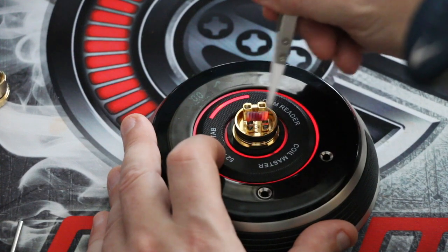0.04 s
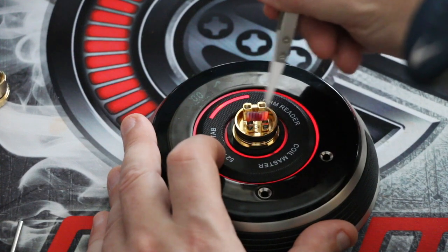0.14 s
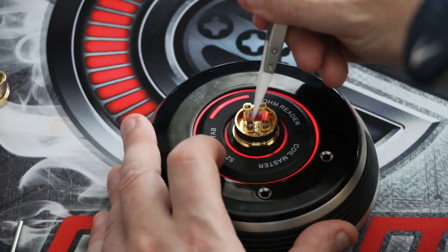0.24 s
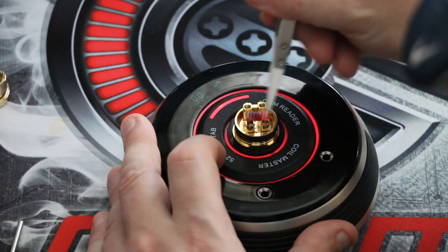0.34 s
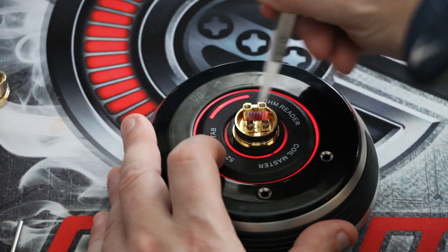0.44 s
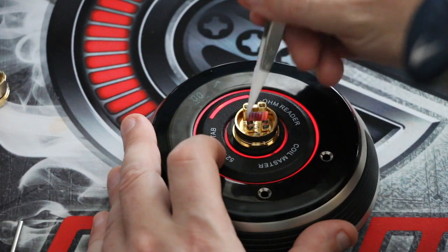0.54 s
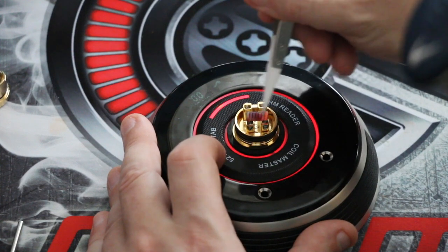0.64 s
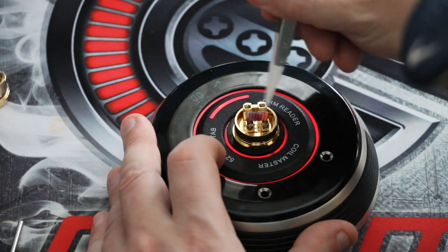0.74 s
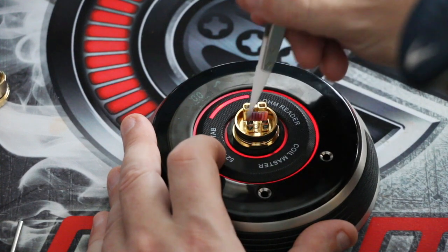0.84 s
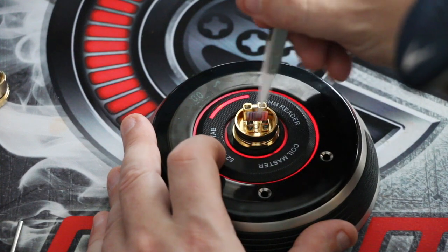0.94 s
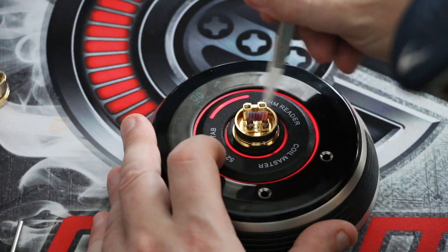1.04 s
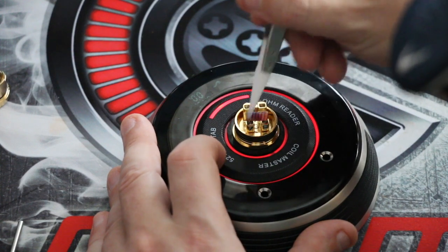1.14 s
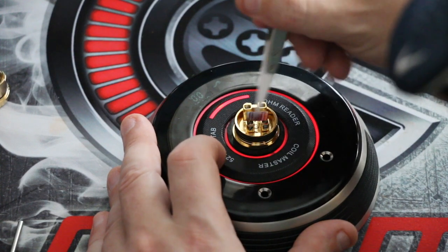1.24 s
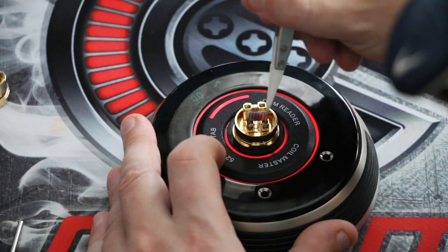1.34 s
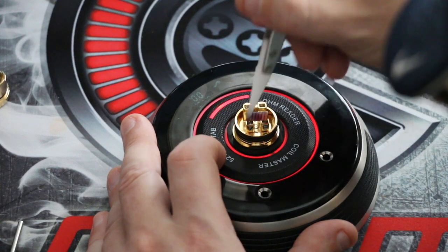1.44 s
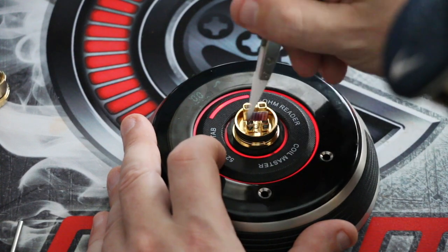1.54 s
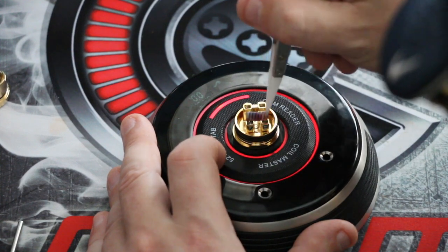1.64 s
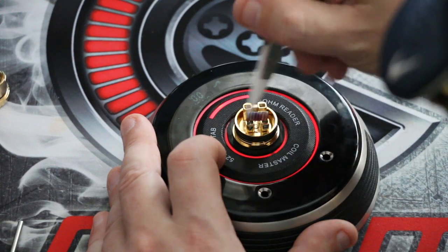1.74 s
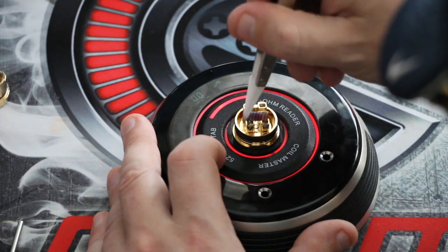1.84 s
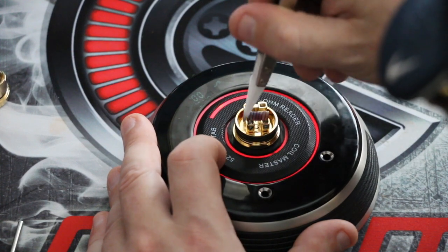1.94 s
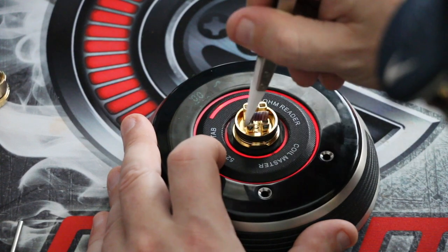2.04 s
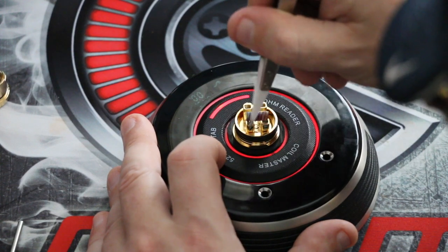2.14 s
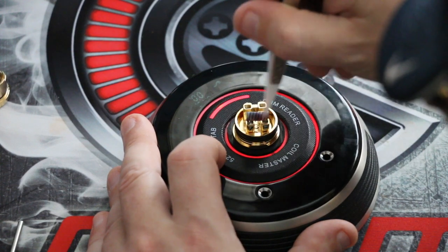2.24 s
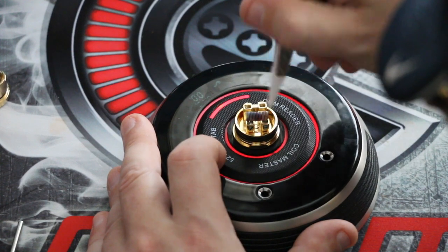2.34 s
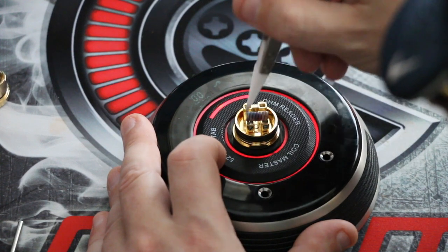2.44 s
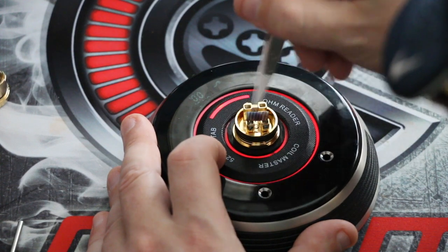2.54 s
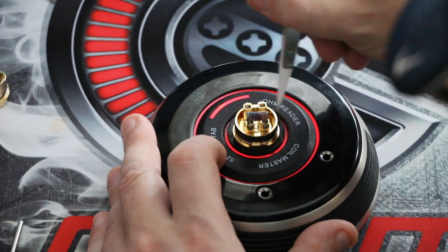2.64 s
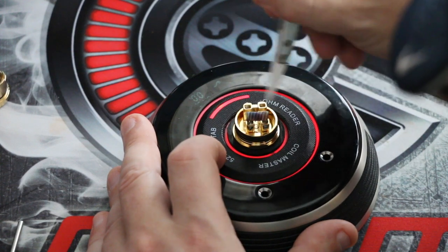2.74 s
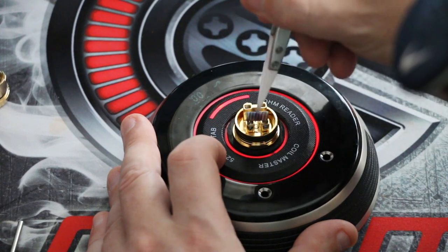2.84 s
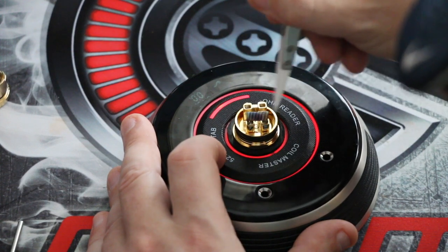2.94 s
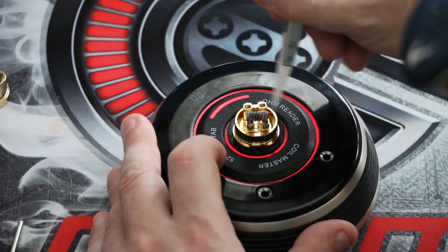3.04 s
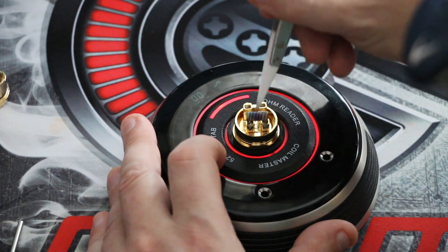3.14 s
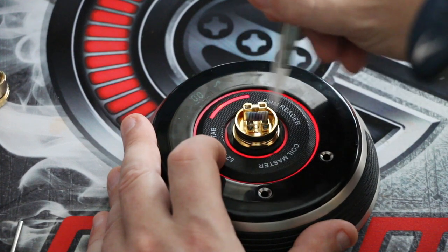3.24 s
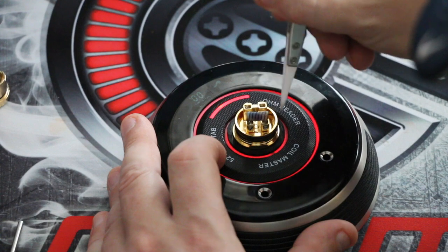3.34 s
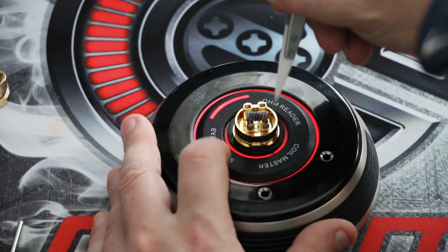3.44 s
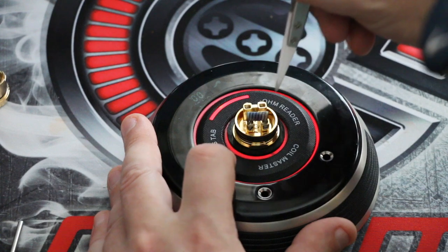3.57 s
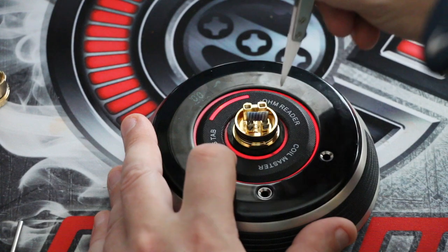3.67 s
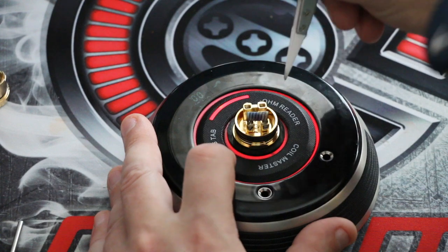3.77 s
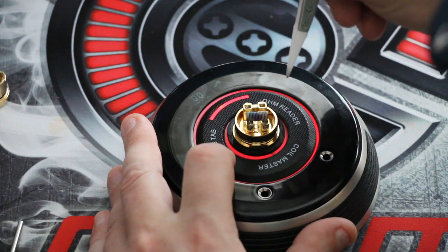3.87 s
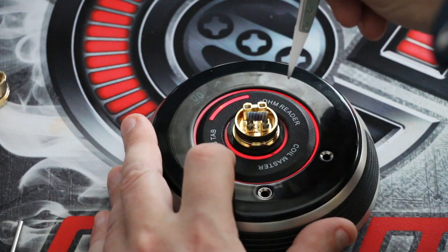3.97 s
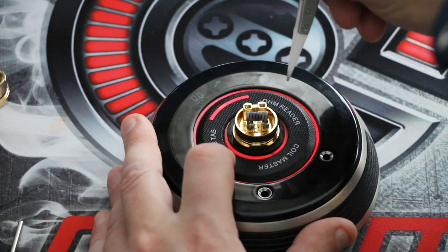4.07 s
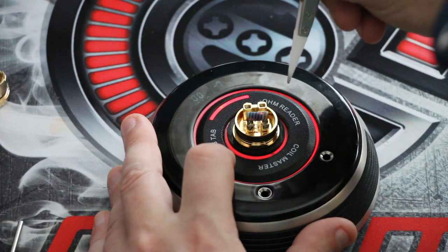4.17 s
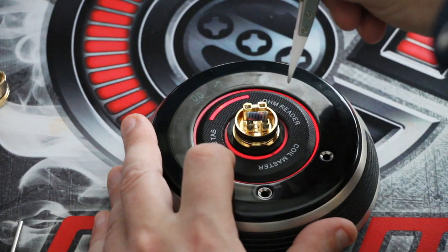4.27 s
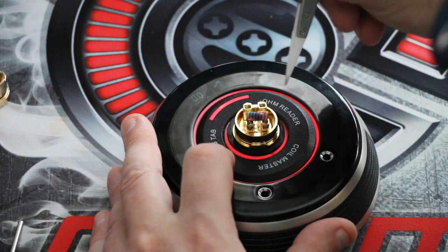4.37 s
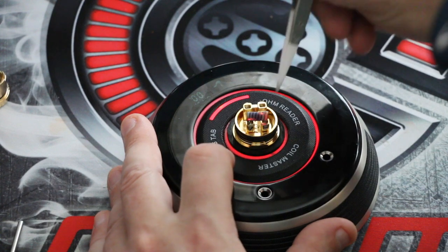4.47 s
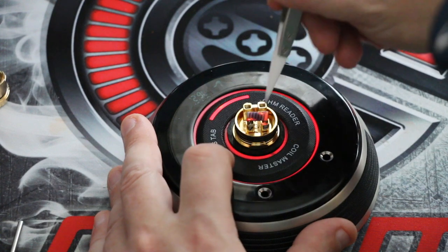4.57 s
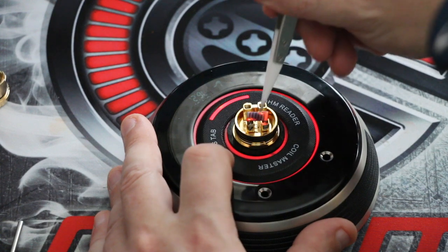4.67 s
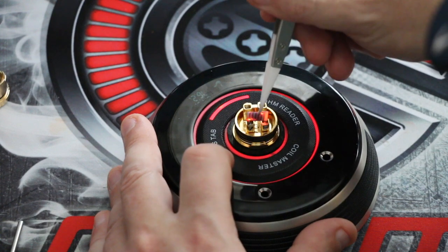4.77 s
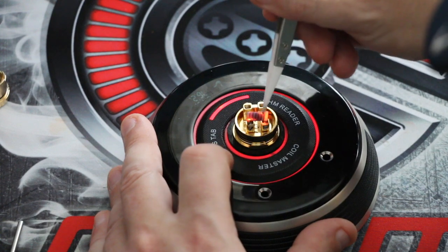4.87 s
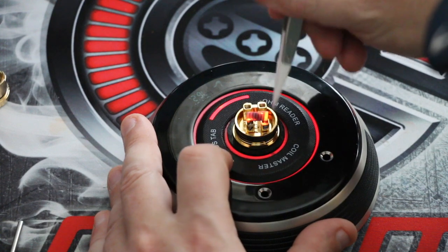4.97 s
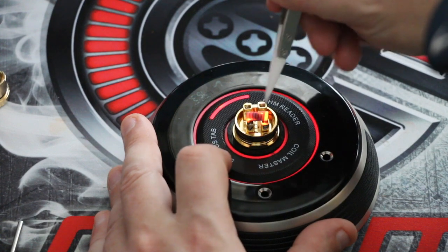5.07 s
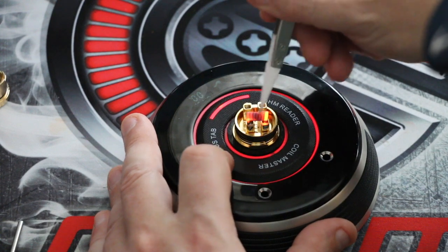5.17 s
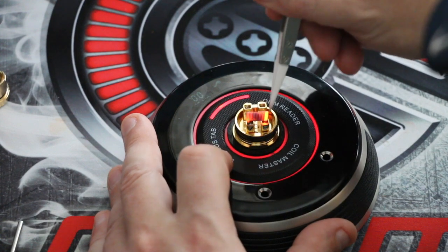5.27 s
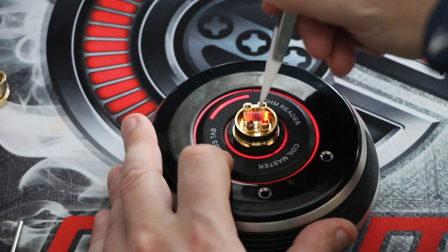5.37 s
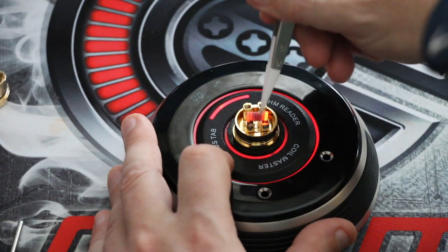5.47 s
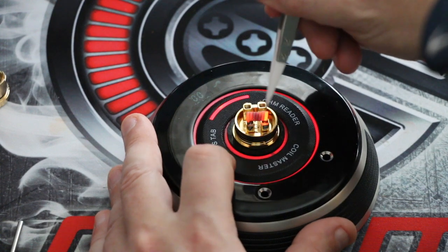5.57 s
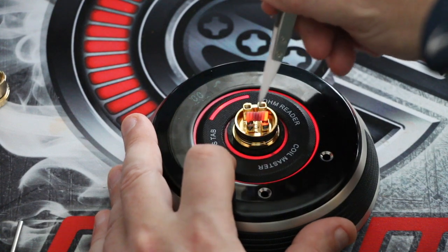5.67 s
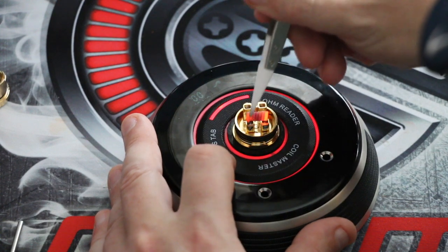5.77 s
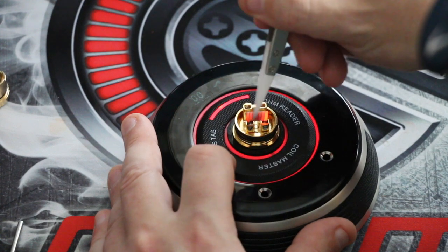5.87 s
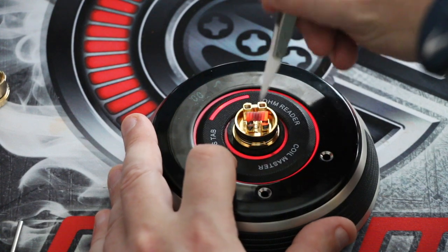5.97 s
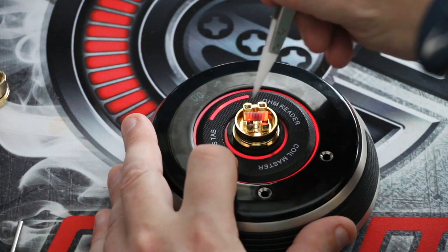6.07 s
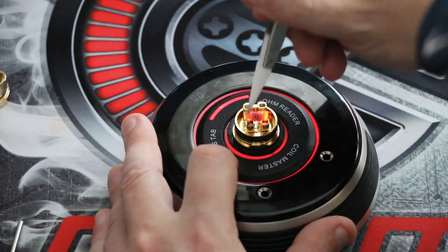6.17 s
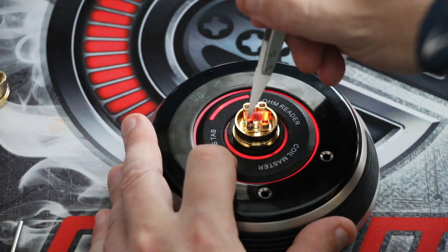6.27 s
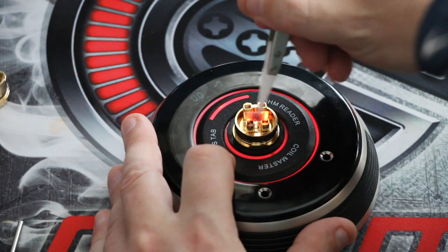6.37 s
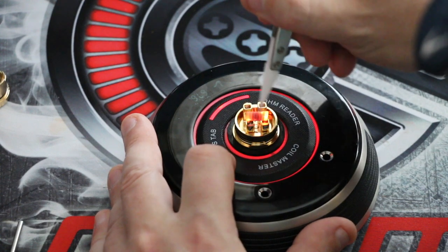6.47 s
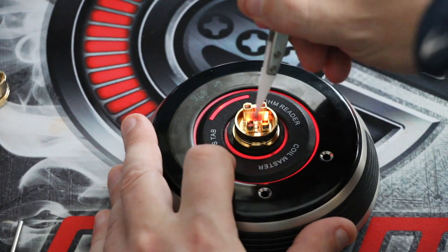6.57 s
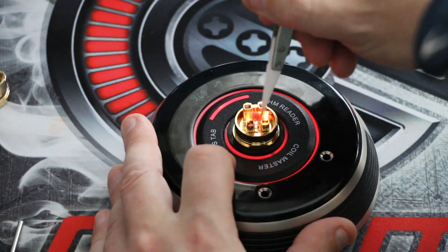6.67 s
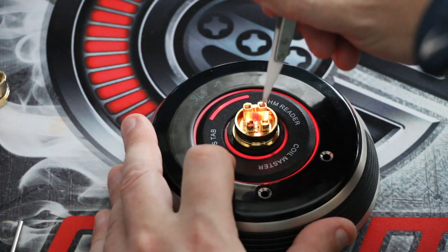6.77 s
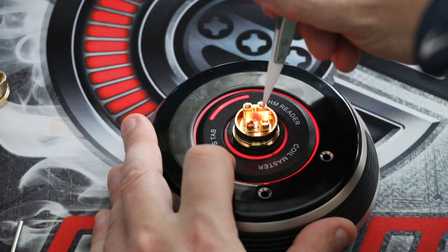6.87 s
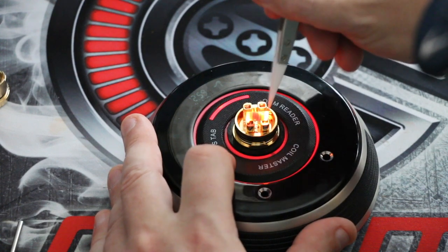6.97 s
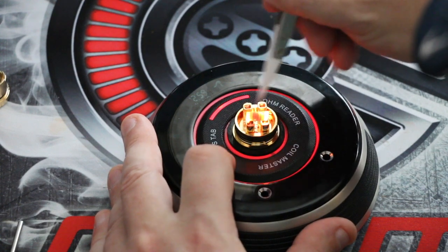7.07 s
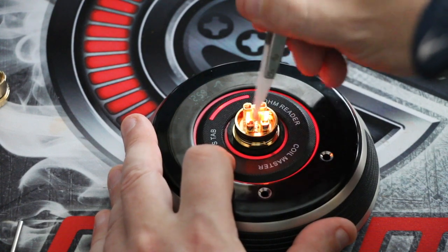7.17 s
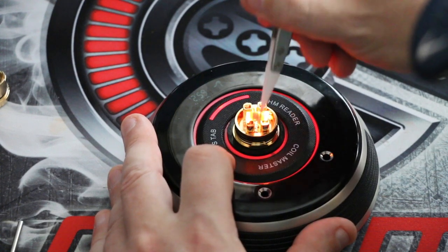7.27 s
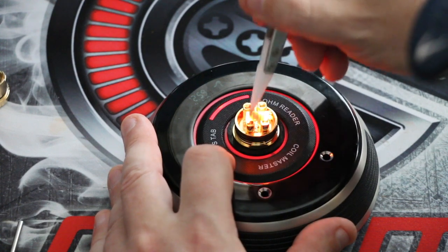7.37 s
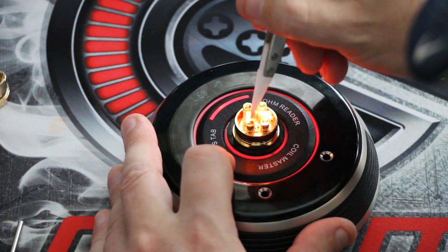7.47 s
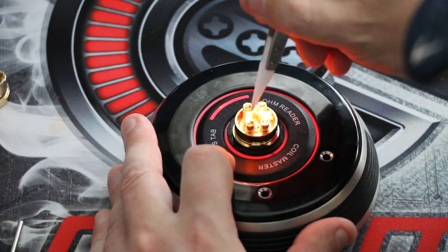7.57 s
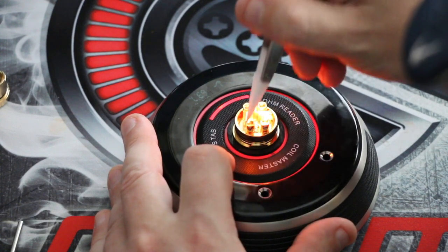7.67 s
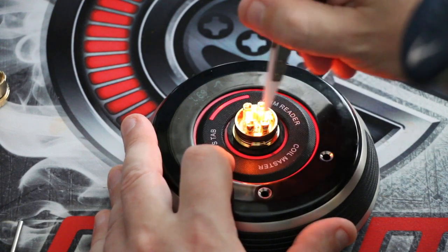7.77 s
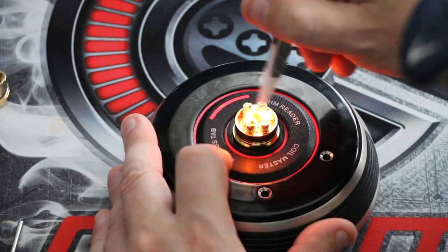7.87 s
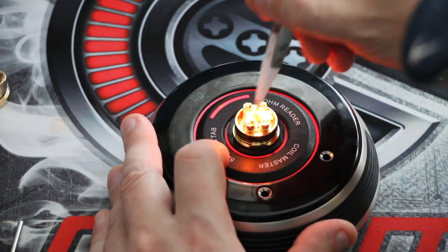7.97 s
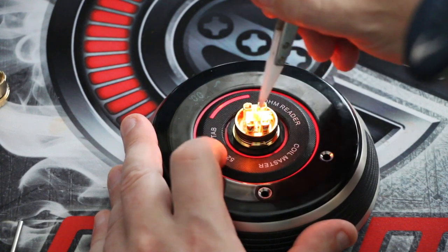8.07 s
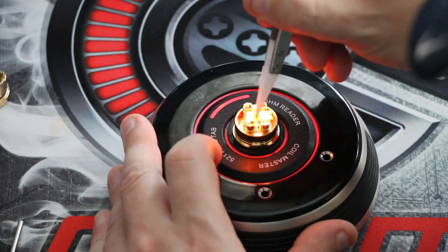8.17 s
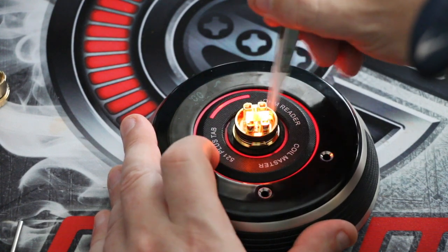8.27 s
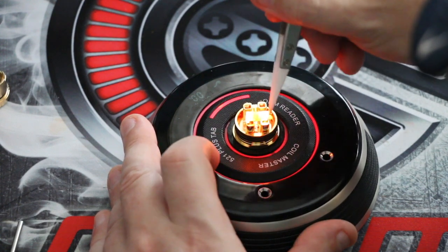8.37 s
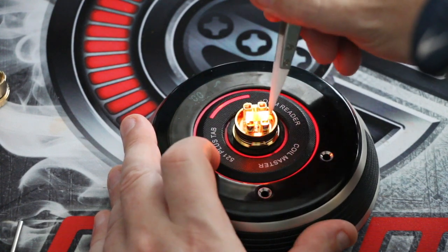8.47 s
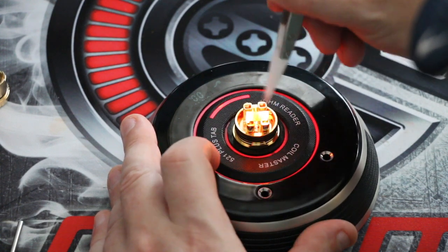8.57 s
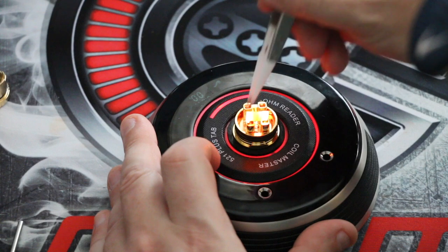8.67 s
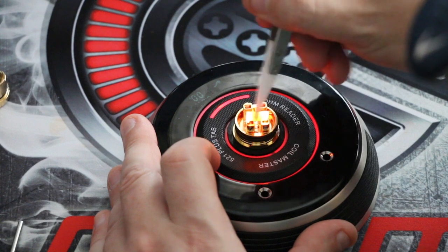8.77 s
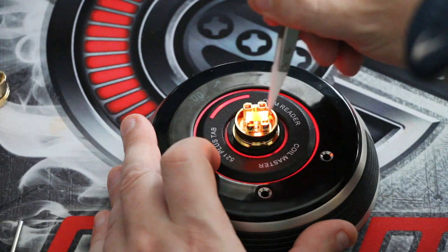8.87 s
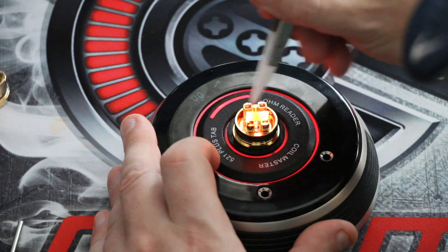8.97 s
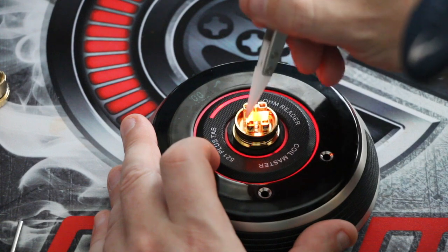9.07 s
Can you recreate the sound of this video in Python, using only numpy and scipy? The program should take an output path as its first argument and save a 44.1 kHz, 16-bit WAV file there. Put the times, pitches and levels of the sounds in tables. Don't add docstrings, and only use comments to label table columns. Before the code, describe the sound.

Short, dry scrapes and clicks of a hard tip over tight wire wraps on a hollow plastic base, about three per second, broken by a brief rest.

```python
import sys
import numpy as np
from scipy import signal
from scipy.io import wavfile
from scipy.ndimage import uniform_filter1d

SR = 44100
rng = np.random.default_rng(int(sys.argv[2]) if len(sys.argv) > 2 else 0)


def volts_from_decibels(level):
    exponent = np.asarray(level, float) / 20
    return 10 ** exponent


def digitize_waveform(pressure):
    field = np.atleast_2d(pressure).T
    bounded = np.clip(field, -1, 1)
    quanta = np.round(bounded * 32767).astype(np.int16)
    wavfile.write(sys.argv[1], SR, quanta)


N = 402191
KNOT_RATE_HZ = 200
KNOT_S = np.arange(0, N / SR + 1, 1 / KNOT_RATE_HZ)

# start_s, time_to_crest_s, opening_db, crest_db,
# deck_re_base_db
STROKES = [(0.047, 0.11, -40, -37.5, -6), (0.366, 0.065, -39.5, -40, -5), (0.683, 0.08, -35.5, -37, -4.5),
           (0.978, 0.099, -39.5, -40.5, -5), (1.283, 0.13, -43.5, -39, -4), (1.638, .09, -36.5, -42.5, -1),
           (1.995, 0.1, -51, -52.5, 0), (2.25, .108, -50, -39.5, -2.5), (2.622, 0.055, -33.5, -34, -4.5),
           (2.962, 0.032, -40, -38.5, -3.5), (3.313, 0.034, -37, -38.5, -5),
           (4.882, 0.15, -49.5, -58, -5.5), (5.247, 0.092, -41.5, -45, -4), (5.565, 0.056, -41, -41.5, -5),
           (5.94, 0.07, -41, -41, -5), (6.403, 0.08, -50.5, -39.5, -5.5), (6.676, 0.15, -46.5, -48.5, -4.5),
           (6.978, 0.096, -56, -46, -14), (7.286, 0.069, -45.5, -43, -3.5), (7.52, 0.082, -62, -41.5, -4),
           (7.791, 0.064, -47.5, -39, -5), (8.236, 0.12, -53.5, -44, -6),
           (8.839, 0.075, -43.5, -39.5, -6.5)]
# start_s, base_peak_db, deck_re_base_db, wire_re_base_db, base_pitch_hz
TOUCHES = [(0.046, -26, -9, -12.5, 650), (0.321, -24.5, -7, -18.5, 720), (0.635, -30.5, -4.5, -11.5, 490),
           (0.976, -34, -4, -5, 470), (1.28, -31.5, -2.5, -5.5, 872), (1.606, -32, -4.5, -14, 570),
           (1.913, -27.5, -9.5, -14, 800), (2.251, -31.5, -6.5, -8.5, 615), (2.577, -26.5, -14.5, -20, 646),
           (2.937, -28.5, -15, -27, 700), (3.267, -26.5, -16, -18, 715), (4.908, -31.5, -5, -26, 490),
           (5.246, -31, -20, -6.5, 457), (5.518, -27, -8, -17, 880), (5.94, -32.5, -0.5, -8.5, 640),
           (6.396, -33.5, -5.5, -14, 714), (6.669, -32.5, -5.5, -13, 490), (6.98, -33.5, -16, -18, 630),
           (7.28, -32, 1, -6.5, 527), (7.509, -37, -7.5, -19, 890), (7.59, -29, 1, -2.5, 494),
           (7.789, -32, -7, -8, 695), (8.239, -35.5, -8, -12, 565), (8.836, -31, -8, -26, 440)]
# start_s, base_peak_db, brightness_db, deck_pitch_hz
CATCHES = [(0.117, -27.5, -3, 2973), (0.373, -28, -9, 2740), (0.687, -35.5, 5, 2740), (0.748, -35, 4, 3080),
           (1.122, -35.5, -0.5, 3300), (1.332, -38, 7.5, 3060), (1.649, -33.5, 9, 2216),
           (1.999, -36.5, -6.5, 2350), (2.076, -36, 3, 2287), (2.32, -34.5, -1, 3100),
           (2.606, -26, -10, 1980), (2.63, -30, 0, 2160), (2.971, -32, 4.5, 2740), (3.289, -30, -5, 2600),
           (3.325, -29.5, -5, 2890), (4.157, -48.5, -1, 3870), (4.807, -39, -15, 2240),
           (4.999, -32.5, -7, 2130), (5.32, -28, -5, 3030), (5.568, -33.5, 3.5, 3100),
           (6.429, -36, 1, 2300), (6.714, -28, -8.5, 3280), (6.81, -26.5, -17, 3180),
           (7.047, -27.5, -9, 2070), (7.56, -36, -19, 3030), (6.756, -30.5, -8, 3050),
           (7.82, -33, -3.5, 2320), (8.318, -20.5, -4.5, 2080), (8.429, -37.5, -15, 2020),
           (8.862, -40.5, 6.5, 2050)]
# centre_hz, width_hz, level_db
BASE_MODES = [(64, 11.7, -18), (173, 25.7, -11), (309.2, 22.7, -10), (490, 33, -3), (571.3, 41.7, -3.5),
              (615, 131, -6.5), (707, 77, -7.5), (865, 42.5, -5.5), (1047, 144, -18), (1271, 18.4, -12),
              (1403, 49, -12.5), (1598, 230, -16.5), (419, 346, -17)]
# centre_hz, width_hz, level_db
DECK_MODES = [(2080, 72, -2), (2217, 21.5, 6), (2387, 360, -4.5), (2740, 65, -3), (2890, 52, -1.5),
              (3030, 130, -4), (3157, 200, -3), (3785, 164, -11), (4095, 146, -18), (2440, 1110, -22)]
# centre_hz, width_hz, level_db
WIRE_MODES = [(4220, 4000, -8), (5195, 60, 14.5), (5146, 240, 6.5), (5690, 130, 5.5), (6700, 6300, -27),
              (8030, 520, -1.5), (8800, 2200, -9), (12900, 3160, -5), (14800, 1900, -7.5)]
# time_s, heat_0_to_1
GLOW = [
    (0, 0.14),
    (3.4, 0.66),
    (5, 0.9),
    (9.2, 0.8),
]
# start_s, peak_db, pitch_hz, t60_s
PINGS = [(0.412, -47, 5360, 0.063), (1.123, -33, 3420, 0.045), (1.923, -40.5, 13830, 0.051),
         (2.003, -53, 5500, 0.06), (2.03, -44, 2380, 0.15), (2.079, -40.5, 1346, 0.16),
         (2.338, -40.5, 5180, 0.081), (2.375, -50, 1334, 0.25), (2.598, -45, 62, 0.15),
         (2.94, -45.5, 166, 0.18), (2.964, -32, 2760, 0.074), (3.016, -46, 1323, 0.19),
         (3.271, -55, 62, 0.24), (3.345, -47, 215, 0.27), (3.622, -48, 288, 0.21),
         (3.865, -57.5, 600, 0.21), (4.947, -45, 2874, 0.077), (5.645, -48.5, 1292, 0.22),
         (2.968, -45.5, 5550, 0.048), (4.158, -54, 4200, 0.037), (8.318, -34, 1480, 0.035),
         (0.395, -43.5, 2240, 0.3), (6.031, -62, 1284, 0.17), (8.317, -30, 985, 0.035),
         (2.635, -34.5, 870, 0.15), (5.525, -41.5, 455, 0.31), (6.748, -52, 65, 0.18),
         (7.605, -32, 540, 0.075), (8.46, -55, 224, 0.14), (8.565, -51, 559, 0.34)]
# time_s, level_db, pitch_hz
GLIDE = [
    (2.47, -74, 5580),
    (2.51, -65, 5290),
    (2.55, -61, 4730),
    (2.58, -55, 4030),
]
# frequency_hz, t60_s
ROOM_T60 = [(100, 1), (500, 0.27), (2000, 0.25), (6000, 0.23), (15000, 0.042)]
# frequency_hz, level_db
ROOM_DB = [(100, -19), (600, -15.5), (1500, -9.5), (4000, -3), (14000, -1.5)]
# frequency_hz, density_db_per_hz
AIR_SPECTRUM = [(12, -45), (20, -10), (86, -6), (234, -6.5), (949, -9.5), (2140, -14), (6910, -18.5),
                (16000, -25.5)]
# frequency_hz, likeness_0_to_1
AIR_LIKENESS = [(60, 0.77), (180, 0.52), (550, 0.47), (1650, 0.25), (4970, 0.0086), (15000, 0.01)]
# centre_hz, width_hz, level_db
HUM = [(118.7, 2, -69.5)]


def evened(x):
    return x / np.sqrt(np.mean(x ** 2) + 1e-20)


def read(points, hz):
    f, value = np.transpose(points)
    return np.interp(np.log(hz + 1), np.log(f + 1), value)


def resonate(x, hz, width_hz):
    pole = np.exp((2j * hz - width_hz) * np.pi / SR)
    return 2 * signal.lfilter([1 - abs(pole)], [1, -pole], x).real


def jumps():
    touch_deck_hz, catch_base_hz, catch_wire_db = 2496, 544, -11
    touches = [(*row, touch_deck_hz) for row in TOUCHES]
    catches = [(s, db, bright_db, catch_wire_db + bright_db, catch_base_hz, hz)
               for s, db, bright_db, hz in CATCHES]
    return np.array(sorted(touches + catches))


def rasp_power():
    lift_s, lift_db, rasp_db, wire_db = 0.058, -17.5, 4.0, -12.5
    open_dull_db, lift_dull_db = -2, -13.5
    power = np.zeros((3, N))
    for s, crest_s, open_db, crest_db, bright_db in STROKES:
        t = np.arange(0, crest_s + lift_s, 1 / SR)
        knots_s = [0, crest_s, crest_s + lift_s]
        base_db = np.interp(t, knots_s, [open_db, crest_db, crest_db + lift_db])
        deck_db = bright_db + np.interp(t, knots_s, [open_dull_db, 0, lift_dull_db])
        level_db = np.array([base_db, base_db + deck_db, base_db + wire_db + deck_db])
        force = volts_from_decibels(level_db + rasp_db) * signal.windows.tukey(len(t), 0.12)
        power[:, round(s * SR):][:, :len(t)] += force ** 2
    return power


def chatter_power():
    jump_db, rise_s, chatter_t60_s = -1.5, 0.0011, 0.075
    power = np.zeros((3, N))
    pace = np.array([[1.0], [1.1], [1.6]]) / chatter_t60_s
    t = np.arange(6000) / SR
    for s, base_db, deck_db, wire_db, *_ in jumps():
        peak_db = np.array([[base_db], [base_db + deck_db], [base_db + wire_db]])
        force = volts_from_decibels(peak_db + jump_db - 60 * t * pace) * (1 - np.exp(-t / rise_s))
        power[:, round(s * SR):][:, :len(t)] += force ** 2
    return power


def contact():
    return np.sqrt(rasp_power() + chatter_power())


def wraps(per_s, depth, sag_s):
    crests_s = np.cumsum(rng.uniform(0.6, 1.4, round(2 * per_s * N / SR))) / per_s
    crests_s = np.sort(np.r_[0, crests_s, jumps()[:, 0]])
    t = np.arange(N) / SR
    since_s = t - crests_s[np.searchsorted(crests_s, t, "right") - 1]
    return evened(1 - depth * (1 - np.exp(-since_s / sag_s)))


def grit(per_s, spread_db):
    strength_db = spread_db * np.minimum(rng.exponential(1, N), 2.6)
    size = volts_from_decibels(strength_db) * rng.choice([-1.0, 1.0], N)
    slips = evened(size * (rng.random(N) < per_s / SR))
    spent = abs(uniform_filter1d(slips ** 2, size=300)) + 0.15
    return evened(slips / spent ** 0.39)


def landings(size, lag_s):
    train = np.zeros(N)
    at = np.round((jumps()[:, 0] + lag_s) * SR).astype(int)
    train[at] = size
    return train


def favoured(modes, column, boost_db, reach, fade_s):
    hits = jumps()
    last = np.maximum(np.searchsorted(hits[:, 0], KNOT_S + 0.012) - 1, 0)
    apart = np.log(np.array(modes)[:, 0] / hits[last, column][:, None])
    fade = np.exp(-abs(KNOT_S - hits[last, 0]) / fade_s)[:, None]
    return boost_db * fade * np.exp(-(apart / reach) ** 2)


def ring(modes, drive, lean_db, wander_db, wander_hz):
    chance = rng.standard_normal((len(KNOT_S), len(modes)))
    pole = np.exp(-2 * np.pi * wander_hz / KNOT_RATE_HZ)
    wander = evened(signal.lfilter([1], [1, -pole], chance, axis=0))
    hz, width_hz, db = np.transpose(modes)
    gain = volts_from_decibels(db + lean_db + wander_db * wander)
    mode_power = gain ** 2 * 2 * np.pi * width_hz / SR
    gain /= np.sqrt(mode_power.sum(1, keepdims=True))
    t = np.arange(N) / SR
    out = np.zeros(N)
    for k in range(len(modes)):
        force = drive * np.interp(t, KNOT_S, gain[:, k])
        out += (-1) ** k * resonate(force, hz[k], width_hz[k])
    return out


def pings():
    rise_s, clean_hz = 0.0013, 504.0
    out, t = np.zeros(N), np.arange(14000) / SR
    for s, db, hz, t60_s in PINGS:
        rough = 0.4 + 1 / (1 + (hz / clean_hz) ** 2)
        shake = resonate(rng.standard_normal(len(t)), hz, 120 + hz / 30)
        tone = np.sin(2 * np.pi * hz * t) + rough * evened(shake)
        part = out[round(s * SR):][:len(t)]
        part += volts_from_decibels(db - 60 * t / t60_s) * (1 - np.exp(-t / rise_s)) * tone
    return out


def glide():
    s, db, hz = np.transpose(GLIDE)
    t = np.arange(s[0], s[-1], 1 / SR)
    centre = np.cos(2 * np.pi * np.cumsum(np.interp(t, s, hz)) / SR)
    fuzz = resonate(rng.standard_normal(len(t)), 0, width_hz=500.0)
    out = np.zeros(N)
    out[round(s[0] * SR):][:len(t)] = volts_from_decibels(np.interp(t, s, db)) * evened(centre * fuzz)
    return out


def room(x):
    spacing, hop = 20, 64
    taps = np.zeros((2, SR // 2))
    at = np.arange(120, SR // 2 - 20, spacing)
    at = at + rng.integers(0, spacing, (2, len(at)))
    np.put_along_axis(taps, at, rng.choice([-1.0, 1.0], at.shape), 1)
    hz, t, z = signal.stft(taps, SR, nperseg=256, noverlap=256 - hop * 2)
    decay = volts_from_decibels(-60 * t / read(ROOM_T60, hz)[:, None])
    share = volts_from_decibels(read(ROOM_DB, hz)) / np.linalg.norm(decay, axis=1)
    decay *= share[:, None]
    tail = signal.istft(z * decay, SR, nperseg=256, noverlap=256 - hop * 2)[1] / np.sqrt(hop / spacing)
    return signal.fftconvolve(x[None], tail, axes=1)[:, :N]


def air():
    air_db = -59
    frames, hz = N // 512 + 5, np.fft.rfftfreq(2048, 1 / SR)
    a, b, c, d = rng.standard_normal((frames, 1025, 4)).T
    same = np.clip(read(AIR_LIKENESS, hz), -1, 1)[:, None]
    left = a + 1j * b
    right = same * left + np.sqrt(1 - same ** 2) * (c + 1j * d)
    z = np.array([left, right]) * volts_from_decibels(read(AIR_SPECTRUM, hz))[:, None]
    tone = signal.istft(z, nperseg=2048, noverlap=1536)[1][:, :N]
    hum = sum(volts_from_decibels(db) * evened(resonate(rng.standard_normal(N), f, w)) for f, w, db in HUM)
    return volts_from_decibels(air_db) * tone / np.std(tone.mean(0)) + hum


def scene():
    base, deck, wire = contact() * wraps(per_s=70.0, depth=0.69, sag_s=0.0082)
    slips = grit(per_s=1300, spread_db=3.0) + landings(size=3.4, lag_s=0.001247)
    glow = np.interp(KNOT_S, *np.transpose(GLOW))[:, None]

    base_lean_db = favoured(BASE_MODES, column=4, boost_db=4.5, reach=0.11, fade_s=0.14)
    main_modes = abs(np.array(BASE_MODES)[:, 0] - 520) < 50
    base_lean_db += 1.4 * glow * main_modes
    low = ring(BASE_MODES, slips * base, base_lean_db, wander_db=2.5, wander_hz=3.7)

    deck_lean_db = favoured(DECK_MODES, column=5, boost_db=12.5, reach=0.038, fade_s=0.047)
    low += ring(DECK_MODES, slips * deck, deck_lean_db, wander_db=2.5, wander_hz=13.0)
    low += pings() + glide()

    narrow = np.array(WIRE_MODES)[:, 1] < 400
    dull_db = -12.0 * glow * narrow
    fine = slips + 1.5 * grit(per_s=5000, spread_db=5.5)
    high = ring(WIRE_MODES, 0.57 * fine * wire, dull_db, wander_db=3.5, wander_hz=36.0)

    direct = low * volts_from_decibels([[0.15], [-0.15]]) + high * volts_from_decibels([[0.9], [-0.9]])
    return direct + room(low + high) + air()


def low_pass(x):
    return signal.sosfilt(signal.butter(12, 16480, fs=SR, output="sos"), x)


def record(dry):
    rolled = signal.sosfilt(signal.butter(2, 38, "high", fs=SR, output="sos"), dry)
    band_limit = signal.firwin(801, 15830, window=("kaiser", 9), fs=SR)
    limited = signal.oaconvolve(rolled, band_limit[None], "same")
    return low_pass(limited)


dry = scene()
out = record(dry)
digitize_waveform(out)
```